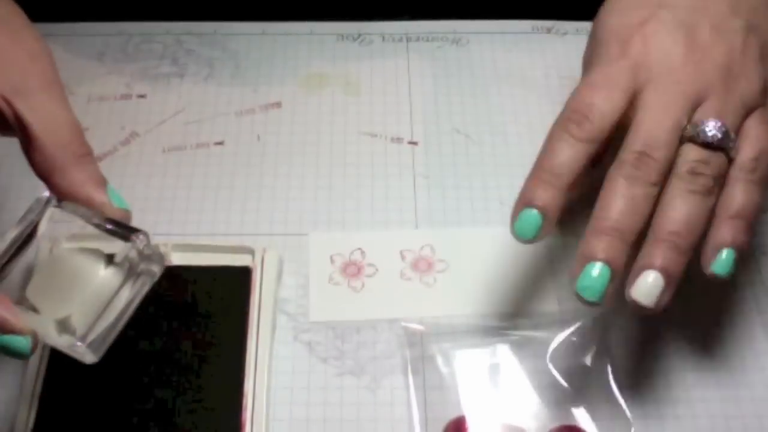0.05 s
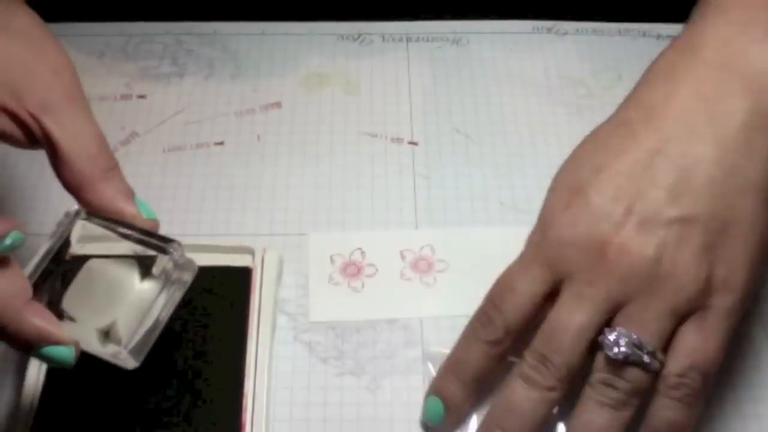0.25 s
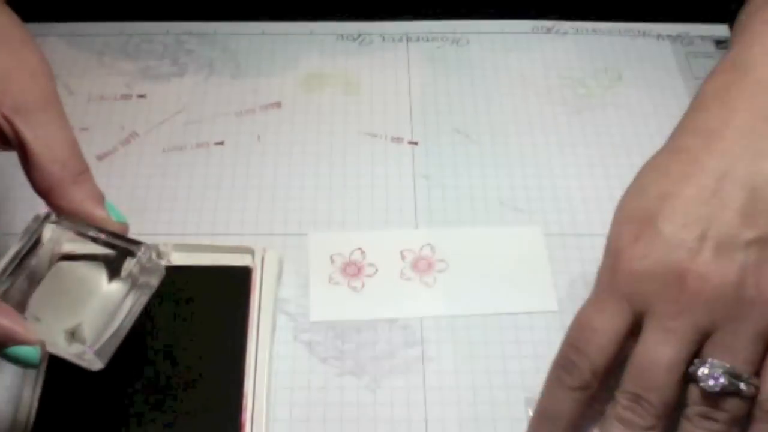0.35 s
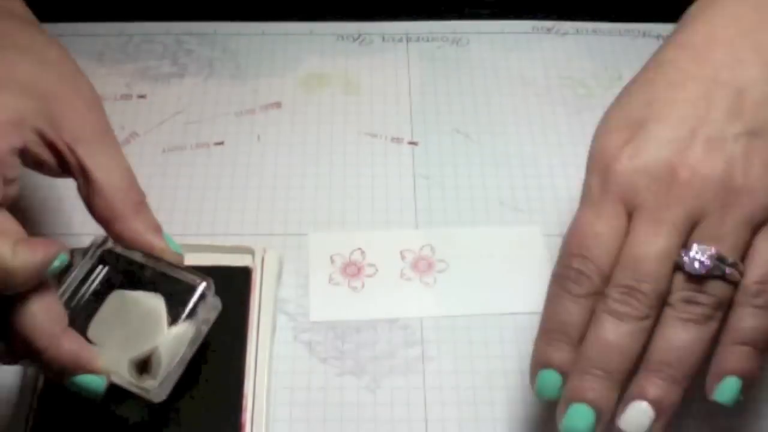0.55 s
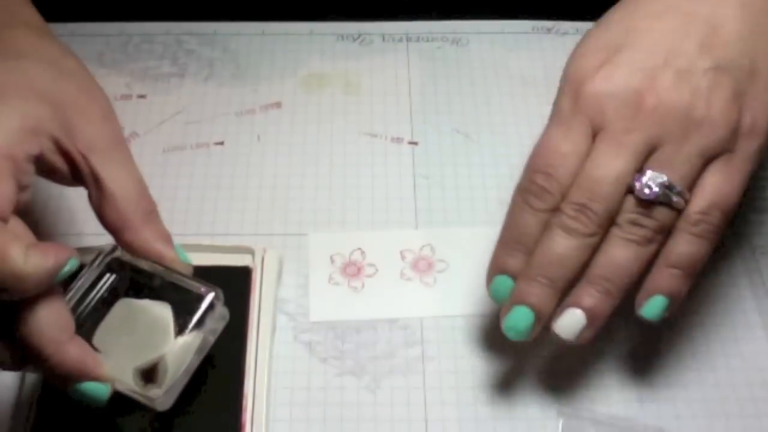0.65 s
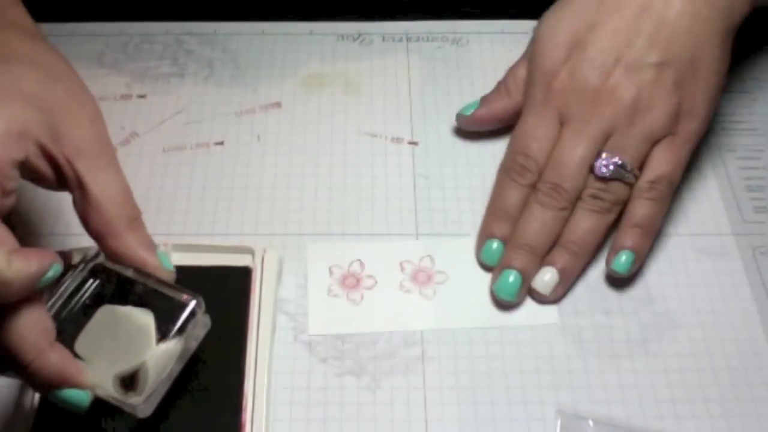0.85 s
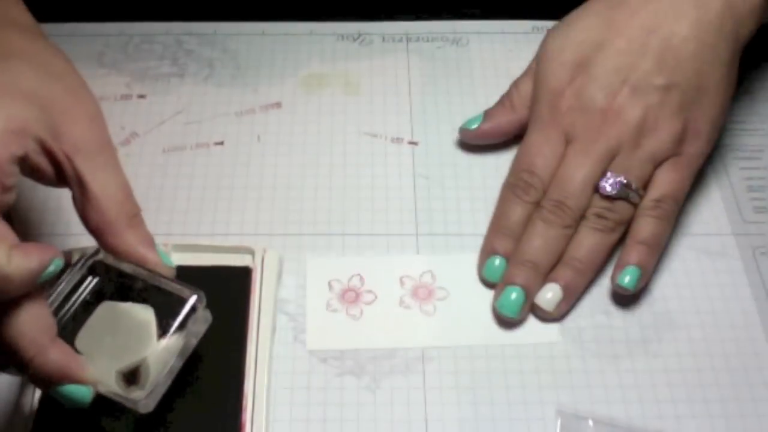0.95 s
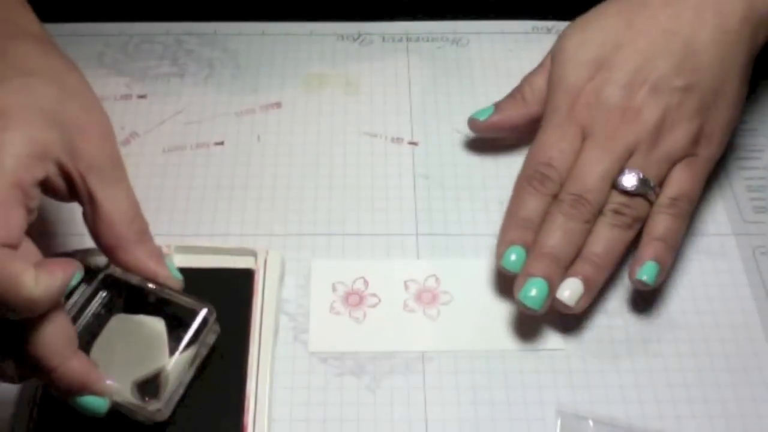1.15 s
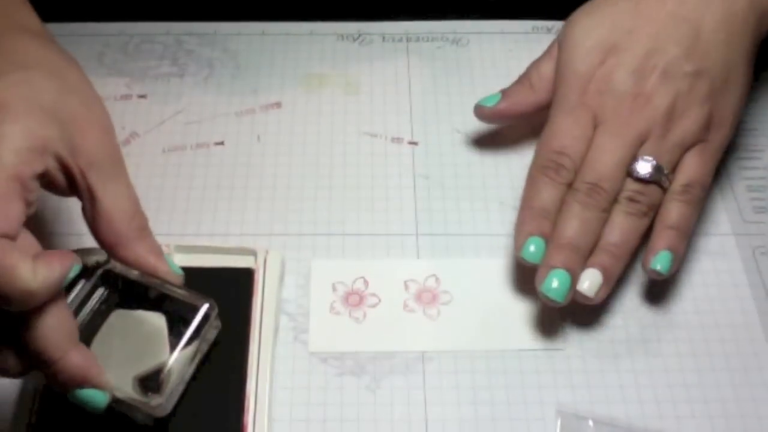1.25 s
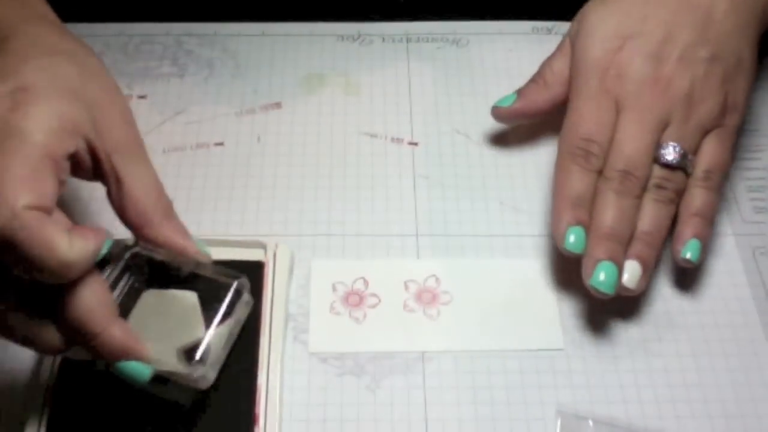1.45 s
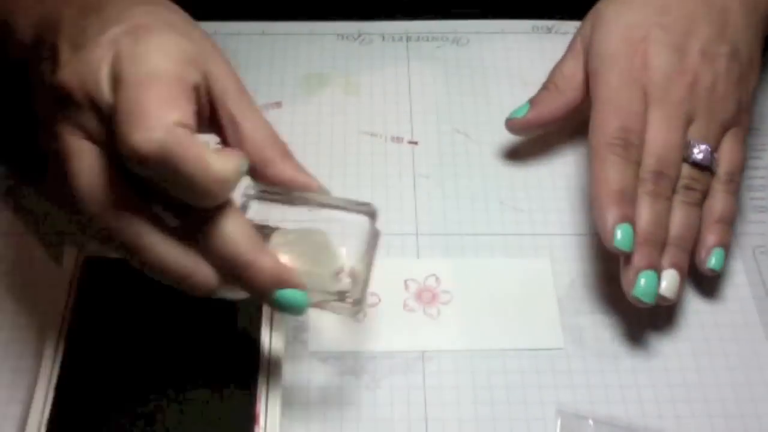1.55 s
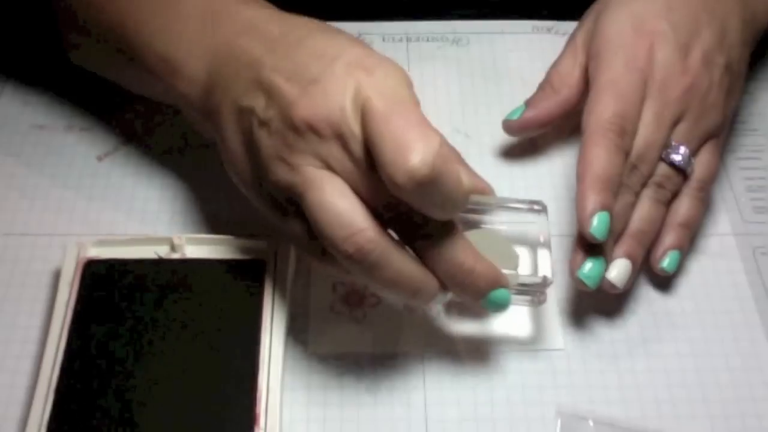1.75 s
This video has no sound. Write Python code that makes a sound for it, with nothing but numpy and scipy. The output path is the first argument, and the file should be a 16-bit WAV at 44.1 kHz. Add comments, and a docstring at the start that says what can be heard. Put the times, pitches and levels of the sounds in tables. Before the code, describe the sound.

A clear stamp block taps an ink pad twice with dull desk thumps, then clicks brightly; before that, fingernails clack and scrape a plastic packet aside. Close microphone, small room, faint hiss.

```python
"""At a craft desk in a small room, close up: fingernails clack on a plastic packet and overload the microphone.
The packet scrapes aside, with a last nail hit, and the hand brushes back over the paper. An acrylic stamp block
taps an ink pad twice, thumping the desk, then gives one bright click as it is lifted. Faint hiss lies underneath.
Knocks are ringing tones set off by impulses; scrapes are grains of noise, and brushes and fizz smooth noise.
"""
import sys
import numpy as np
from scipy import signal
from scipy.fft import rfft, irfft
from scipy.io import wavfile

SR = 44100
rng = np.random.default_rng(int(sys.argv[2]) if len(sys.argv) > 2 else 0)


def generate_wav(sig):
    """Save sig (samples, or channels by samples) to the path in sys.argv[1] as 16-bit PCM at SR."""
    pcm = np.round(np.clip(np.atleast_2d(sig).T, -1, 1) * 32767).astype(np.int16)
    wavfile.write(sys.argv[1], SR, pcm)


N = 79380  # length in samples
T = np.arange(N) / SR  # time in seconds
# t60 is the time in seconds a sound takes to die away by 60 dB.
# A "tone" table only shapes noise (dB per Hz, relative); the loudness is set separately.


def from_db(db):
    """Turn decibels into gain."""
    return 10 ** (np.asarray(db) / 20)


def at_hz(points, hz):
    """Read a table between its rows, on a log-frequency axis."""
    f, v = np.transpose(points)
    return np.interp(np.log(hz + 1), np.log(f), v)


def level(curve):
    """Gain over time from (t/s, level/dB) rows; silent outside them."""
    s, db = np.transpose(curve)
    return from_db(np.interp(T, s, db)) * (T > s[0]) * (T < s[-1])


def coloured(tone, source):
    """Filter a source to this tone without smearing it backwards in time; white noise keeps its level."""
    gain = from_db(at_hz(tone, np.arange(N // 2 + 1) * SR / N))
    cepstrum = irfft(np.log(gain / np.sqrt(np.mean(gain ** 2))), N)
    # Folding the cepstrum makes the filter minimum phase: it acts only after each sound.
    causal = np.r_[1, np.full(N // 2 - 1, 2), 1, np.zeros(N // 2 - 1)]
    response = np.exp(rfft(cepstrum * causal))
    return irfft(rfft(source) * response, N)


def noise(tone):
    """Smooth random noise with this tone, at an rms level of 1."""
    return coloured(tone, rng.standard_normal(N))


def grains(per_s, spread_db):
    """Random tiny slips of uneven size, pushing either way."""
    sizes_db = spread_db * np.minimum(rng.exponential(1, N), 4)
    sizes = from_db(sizes_db) * rng.choice([-1, 1], N)
    return sizes * (rng.random(N) < per_s / SR)


def blows(rows):
    """One instant push for each (t/s, level/dB) row."""
    x = np.zeros(N)
    for s, db in rows:
        x[int(s * SR)] += from_db(db)
    return x


def bursts(rows, tone):
    """Sudden, dying puffs of noise from (t/s, level/dB, t60/s) rows."""
    dying = np.zeros(N)
    for s, db, t60 in rows:
        decay = np.exp(-np.log(1000) * np.maximum(T - s, 0) / t60)
        dying += (T >= s) * from_db(db) * decay
    return coloured(tone, dying * rng.standard_normal(N))


def ring(force, modes):
    """An object struck by a force rings at several pitches at once, each dying at its own pace."""
    out = np.zeros(N)
    for k, (hz, db, t60) in enumerate(modes):
        r = np.exp(-np.log(1000) / (t60 * SR))
        w = 2 * np.pi * hz / SR
        tone = signal.lfilter([0, np.sin(w)], [1, -2 * r * np.cos(w), r * r], force + 1e-18)
        out += (-1) ** k * from_db(db) * tone  # alternating signs
    return out


def softened(x, hz):
    """A soft contact loses its treble."""
    return signal.sosfilt(signal.butter(3, hz, fs=SR, output="sos"), x)


# Tone of the background hiss: f/Hz, level/dB
HISS_TONE = [(25, 0), (55, -4), (85, 5), (140, 1), (300, 1.5), (500, -1.5), (800, 1), (1500, -3.5),
             (2200, -8.5), (3200, -5.5), (5000, -13.5), (8000, -22.5), (11000, -28), (16000, -42.5)]
HISS_DB = -58.5


def hiss():
    """Steady background hiss: coloured random noise."""
    return from_db(HISS_DB) * noise(HISS_TONE)


# How strongly the room tail answers at each pitch: f/Hz, level/dB
ROOM_COLOUR = [(60, -14), (130, 8), (200, 3.5), (300, 1), (600, -1), (1300, 0), (2700, 2), (5000, -4.5),
               (9000, -3), (16000, -10.5)]
# How long it lasts at each pitch: f/Hz, t60/s
ROOM_T60 = [(120, .26), (300, .23), (700, .26), (2500, .26), (6000, .23), (14000, .17)]
ROOM_DB, ROOM_DELAY_S = -12, .008


def room(x):
    """The small room blurs the sound into a noisy tail, each band of pitch dying at its own pace."""
    edges = np.geomspace(50, 18000, 13)
    white = rng.standard_normal((2, N))  # neighbouring bands take turns with two noises
    age = np.maximum(T - ROOM_DELAY_S, 0)
    tail = 0
    for k, (low, high) in enumerate(zip(edges, edges[1:])):
        band = signal.sosfilt(signal.butter(2, [low, high], "band", fs=SR, output="sos"), white[k % 2])
        hz = np.sqrt(low * high)
        rate = np.log(1000) / at_hz(ROOM_T60, hz)
        fading = np.exp(-rate * age) * np.sqrt(2 * rate / SR)  # evens out long and short decays
        tail = tail + band * from_db(at_hz(ROOM_COLOUR, hz)) * fading
    return from_db(ROOM_DB) * signal.fftconvolve(x, tail * (age > 0))[:N]


# The hand brushes the paper: t/s, level/dB
BRUSH = [(.79, -100), (.806, -47.5), (.83, -54), (.88, -45), (.91, -43.5), (.955, -50), (1.015, -50.5),
         (1.045, -70), (1.08, -70)]
# The fingers shift on the paper: t/s, level/dB
SHIFT = [(1.7, -75), (1.75, -68.5), (1.81, -64)]
# Tone of skin on paper: f/Hz, level/dB
PAPER_TONE = [(1000, -27), (2500, -17.5), (3500, -5.5), (4000, -0.5), (4900, -7), (6200, 0.5), (8200, -4.5),
              (9500, -15), (10800, -16), (11800, -38), (16000, -37)]


def hand_brush():
    """Skin rubbing over paper makes a soft hiss that swells and fades with the hand."""
    return (level(BRUSH) + level(SHIFT)) * noise(PAPER_TONE)


# Bright clicks of the block and nails: t/s, level/dB
CLICKS = [(.8085, -45), (.8132, -56), (1.5026, 2.5)]
# Ring of the acrylic block: f/Hz, level/dB, t60/s
BLOCK_MODES = [(1950, -37, 0.013), (2930, -19.5, 0.01), (3300, -15, 0.0096), (4400, -5.5, 0.0094),
               (4980, -5.5, 0.0096), (5450, -10, 0.015), (7108, -11, 0.0061), (8430, -20, 0.013),
               (9340, -21.5, 0.0071), (12700, -37, 0.0082), (15200, -32, 0.0044)]
# Tone of the noisy crack that starts each click: f/Hz, level/dB
CRACK_TONE = [(800, -55), (1500, -38), (2800, -11), (3800, -4), (6200, 0), (9300, -6), (10500, -24),
              (16000, -32)]
CRACK_DB, CRACK_T60_S = -15, .008  # level against its click
# Faint pitched ticks, before softening: t/s, level/dB
TICKS = [(.561, -43.5), (1.455, -34.5)]
# Their ring: f/Hz, level/dB, t60/s
TICK_MODES = [(4290, 1, 0.024)]
TICK_SOFT_HZ = 5000  # treble above this is lost
# Light knock of the block in the fingers: t/s, level/dB
KNOCKS = [(.7486, -31.5)]
# Its ring: f/Hz, level/dB, t60/s
KNOCK_MODES = [(1333, -5, .018), (2320, 0, 0.022), (2580, -1, .014), (3230, -7, .012), (3837, -11.5, 0.014),
               (4830, -15, .01)]
# The stamp peels from the ink: t/s, level/dB
PEEL = [(1.44, -82), (1.47, -52), (1.5, -47), (1.53, -49), (1.57, -58), (1.615, -55), (1.64, -74)]
# Tone of its fizz: f/Hz, level/dB
FIZZ_TONE = [(1500, -13), (2800, -13), (3600, -3), (4800, -8), (6200, -7), (7500, -13), (9000, -13),
             (11000, -32), (16000, -50)]


def block_handling():
    """Small contacts make the acrylic click, tick and knock; the stamp leaving the ink fizzes."""
    clicks = ring(blows(CLICKS), BLOCK_MODES)
    cracks = bursts([(s, db + CRACK_DB, CRACK_T60_S) for s, db in CLICKS], CRACK_TONE)
    ticks = ring(softened(blows(TICKS), TICK_SOFT_HZ), TICK_MODES)
    knocks = ring(blows(KNOCKS), KNOCK_MODES)
    fizz = level(PEEL) * noise(FIZZ_TONE)
    return clicks + cracks + ticks + knocks + fizz


# Taps on the pad: t/s of first touch, level/dB of touch, t/s of landing, level/dB of landing
TAPS = [(1.1697, -11.5, 1.1722, 2.5), (1.3746, -22.5, 1.3767, 1.5)]
# Pad case at first touch, before softening: f/Hz, level/dB, t60/s
TOUCH_MODES = [(688, -5.5, 0.031), (934, 1.5, 0.013), (2170, -13, .012), (3290, -18, 0.015)]
# Pad case on landing, before softening: f/Hz, level/dB, t60/s
PAD_MODES = [(425, -32, 0.03), (738, -20.5, 0.021), (1078, -14.5, 0.017), (1280, -20, 0.016),
             (1582, -17.5, 0.016), (2100, -19.5, 0.017), (2374, -14.5, 0.012), (2757, -13.5, 0.012),
             (3420, -19, .018), (3726, -21.5, 0.021), (4250, -28.5, 0.0086), (4980, -31.5, 0.0078)]
# Desk under the pad, before softening: f/Hz, level/dB, t60/s
DESK_MODES = [(118, -22, .075), (210, -25, 0.044), (284, -12.5, .034)]
RUBBER_HZ = 5000  # the soft stamp takes off the treble above this
# Delay after the landing, and level against it:
SEAT_S, SEAT_DB = 0.003014, -10.5  # the far edge of the block settles
REBOUND_S, REBOUND_DB = 0.01456, -8  # the desk is bumped a second time
# Tone of the stamp rubber squashing on the pad: f/Hz, level/dB
SQUASH_TONE = [(70, -34), (125, 1), (210, 1), (340, -1), (500, -15), (800, -3), (1300, -3), (3000, -8.5),
               (4500, -13), (6500, -38), (10000, -58)]
SQUASH_DB, SQUASH_T60_S = -25, .06  # level against the landing
# The stamp scuffs on the pad after landing: t/s, level/dB, t60/s
SCUFFS = [(1.181, -48, 0.12), (1.377, -42, 0.048), (1.391, -40.5, 0.081)]
# Tone of the wet scuff: f/Hz, level/dB
SCUFF_TONE = [(1500, -22), (3000, -8), (4400, 9), (6000, -2.5), (7500, -16.5), (9500, -19), (11500, -37),
              (16000, -44)]


def pad_taps():
    """An edge touches, then the block lands: the case rings, the desk thumps, the rubber squashes and scuffs."""
    touch = blows([row[:2] for row in TAPS])
    landings = [row[2:] for row in TAPS]
    landing = blows(landings)
    seat = blows([(s + SEAT_S, db + SEAT_DB) for s, db in landings])
    rebound = blows([(s + REBOUND_S, db + REBOUND_DB) for s, db in landings])
    case = ring(touch, TOUCH_MODES) + ring(landing + seat, PAD_MODES)
    desk = ring(landing + rebound, DESK_MODES)
    squash = bursts([(s, db + SQUASH_DB, SQUASH_T60_S) for s, db in landings], SQUASH_TONE)
    return softened(case + desk, RUBBER_HZ) + squash + bursts(SCUFFS, SCUFF_TONE)


CRINKLE_DB, CRINKLE_HZ = 2.6, 79.7  # spread of the flicker, and new random gains per second


def crinkled(x):
    """Make the scrape flicker: each third of an octave gets its own wandering gain."""
    hz = np.arange(N // 2 + 1) * SR / N
    band = np.floor(3 * np.log2(np.maximum(hz, 400)))  # everything below 400 Hz joins the lowest band
    spectrum, out = rfft(x), 0
    for k in np.unique(band):
        wander = np.interp(T * CRINKLE_HZ, np.arange(N), rng.standard_normal(N))
        out = out + irfft(spectrum * (band == k), N) * from_db(CRINKLE_DB * wander)
    return out


# The packet slides: t/s, level/dB
SLIDE = [(.235, -57), (.255, -25), (.285, -23.5), (.309, -25), (.32, -20.5), (.35, -22.5), (.382, -25.5),
         (.392, -31), (.417, -25), (.435, -34), (.47, -41), (.525, -58), (.67, -62), (.78, -69)]
# Tone of the scrape when fast: f/Hz, level/dB
FAST_TONE = [(50, -51.5), (130, -24), (300, -11), (550, -14), (800, -14), (1500, -7), (3200, -1.5),
             (4700, 1), (7000, -4.5), (9500, -12.5), (12000, -29), (16000, -30)]
# Tone of the scrape when slowing down: f/Hz, level/dB
SLOW_TONE = [(50, -55), (130, -25), (300, -14), (550, -13.5), (900, -7.5), (2100, -3), (3300, -1.5),
             (5200, -5.5), (7500, -11), (10000, -20), (12000, -28.5), (16000, -39)]
SLOWING_S, SLOWING_SPAN_S = 0.362, 0.027  # middle and length of the change from fast to slow
SCRAPE_GRAINS_PER_S, SCRAPE_SPREAD_DB = 7000, 3


def packet_slide():
    """Plastic on paper makes a dense run of tiny slips, duller as it slows."""
    slow = np.clip((T - SLOWING_S) / SLOWING_SPAN_S + .5, 0, 1)  # 0 is fast, 1 is slow
    slips = crinkled(grains(SCRAPE_GRAINS_PER_S, SCRAPE_SPREAD_DB))
    slips = level(SLIDE) * slips / slips.std()
    return coloured(FAST_TONE, (1 - slow) * slips) + coloured(SLOW_TONE, slow * slips)


# Nails and packet hit the desk: t/s, level/dB, t60/s of clatter, ring level/dB added to the hit level
NAIL_HITS = [(.2178, -27.5, 0.027, -8), (0.2291, -14.5, 0.0074, -8.5), (0.2316, 7.5, .013, -2.5),
             (.2385, -6.5, 0.026, -6), (0.2489, 6, .013, -1), (0.2698, -4, .016, -1),
             (0.2933, -10.5, 0.027, -5)]
# Ring of the packet on the desk: f/Hz, level/dB, t60/s
PACKET_MODES = [(928, -18.5, 0.043), (1550, -21, 0.017), (2021, -14.5, 0.023), (2586, -8.5, .035),
                (3150, -11, .03), (3944, -6, .018), (4650, -14, 0.024), (5720, -10.5, 0.026),
                (7553, -17, .009), (8530, -14.5, 0.019)]
# Tone of its clatter: f/Hz, level/dB
CLATTER_TONE = [(60, -45), (130, -28), (300, -12), (800, -6), (1300, -6), (2800, 1), (5500, -4),
                (8500, -10), (12000, -19), (16000, -28), (19000, -50.5)]
CLATTER_DB = -3  # added to the level of every clatter
# The last nail hit on the packet, as the slide fades: t/s, level/dB, t60/s
LAST_NAIL_HIT = [(.4466, -14, 0.028)]
# Tone of the last nail hit: f/Hz, level/dB
LAST_HIT_TONE = [(60, -42), (170, -8.5), (400, -6.5), (900, -14.5), (2000, -11.5), (3000, -4), (3900, 2),
                 (4700, -5.5), (5600, -13), (6900, -7), (8300, -21), (11000, -39), (16000, -46)]


def nails():
    """Each hit rings the packet and sets off a dense clatter of noise; the last hit is a noise burst alone."""
    body = ring(blows([(s, db + ring_db) for s, db, _, ring_db in NAIL_HITS]), PACKET_MODES)
    clatter = bursts([row[:3] for row in NAIL_HITS], CLATTER_TONE)
    last_hit = bursts(LAST_NAIL_HIT, LAST_HIT_TONE)
    return body + from_db(CLATTER_DB) * clatter + last_hit


def scene():
    """Add up all the handling, its room tail and the hiss."""
    near = hand_brush() + block_handling() + pad_taps() + packet_slide() + nails()
    return (hiss() + room(near) + near)[None]


LOW_CUT_HZ, CUTOFF_HZ = 88, 16000
OVERLOAD = .92  # loudest sample value before clipping


def record(dry):
    """The microphone drops the deep bass, the loudest hits are clipped flat, then the top is cut."""
    lean = signal.sosfilt(signal.butter(5, LOW_CUT_HZ, "high", fs=SR, output="sos"), dry)
    clipped = np.clip(lean, -OVERLOAD, OVERLOAD)
    return signal.sosfilt(signal.ellip(10, .1, 70, CUTOFF_HZ, fs=SR, output="sos"), clipped)


dry = scene()
out = record(dry)
generate_wav(out)
```